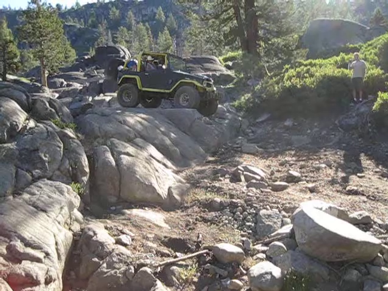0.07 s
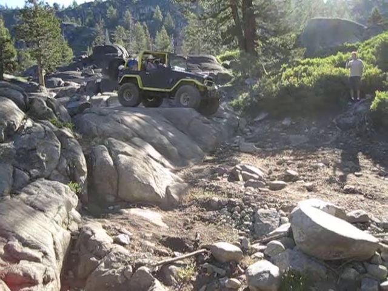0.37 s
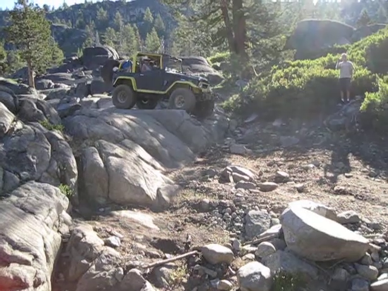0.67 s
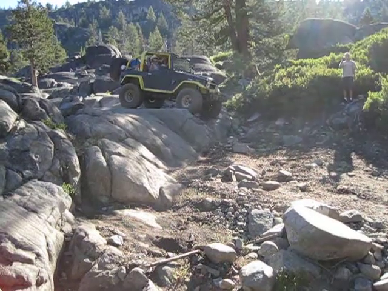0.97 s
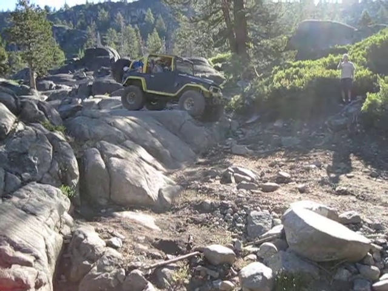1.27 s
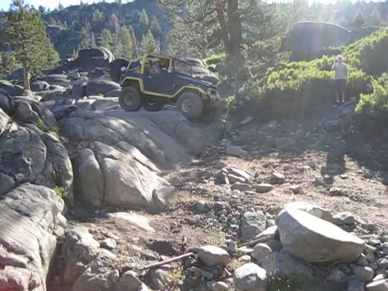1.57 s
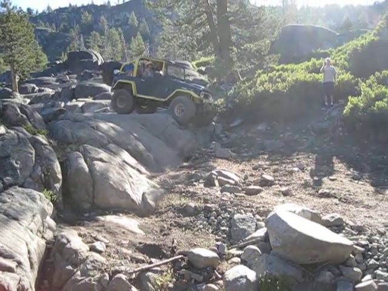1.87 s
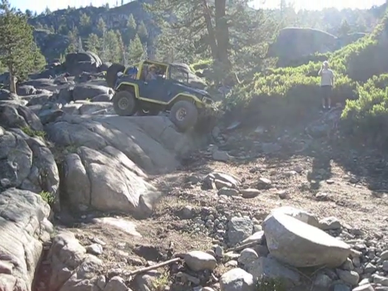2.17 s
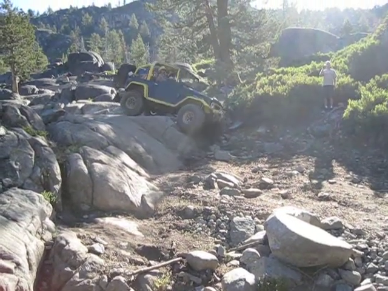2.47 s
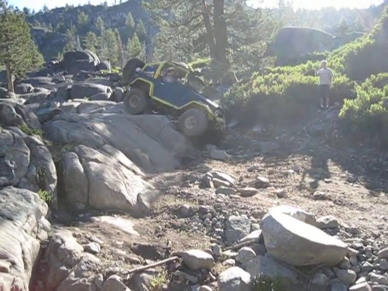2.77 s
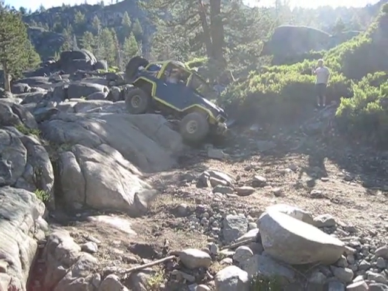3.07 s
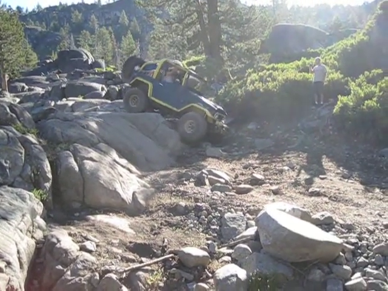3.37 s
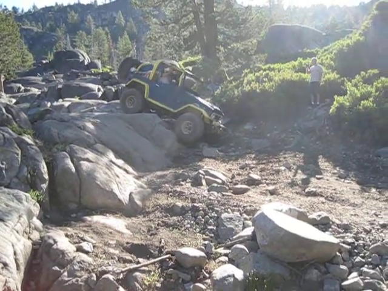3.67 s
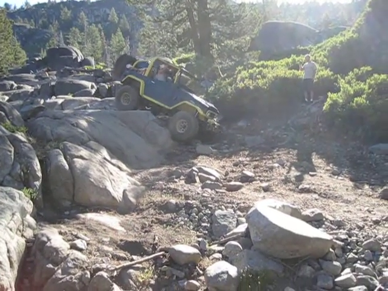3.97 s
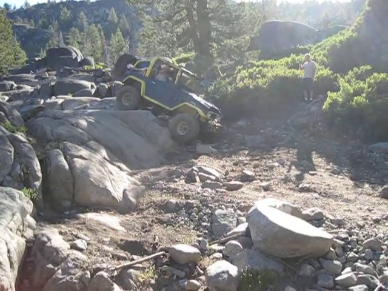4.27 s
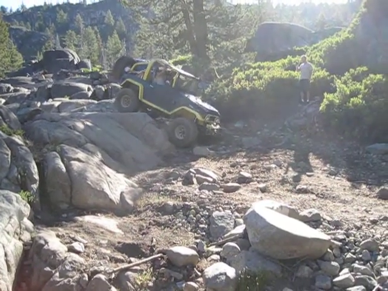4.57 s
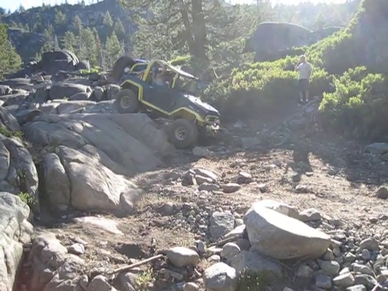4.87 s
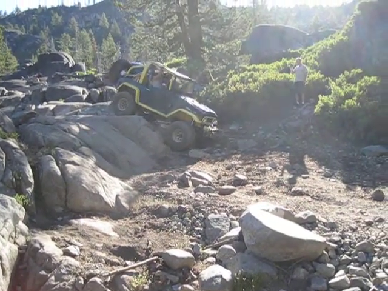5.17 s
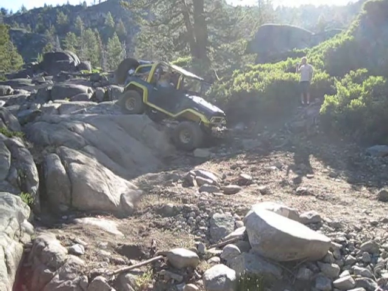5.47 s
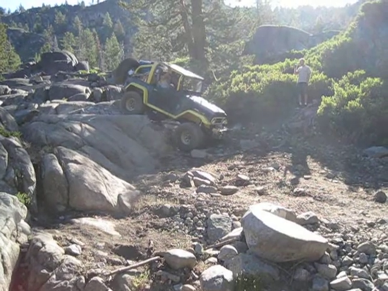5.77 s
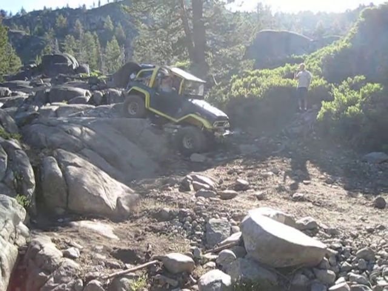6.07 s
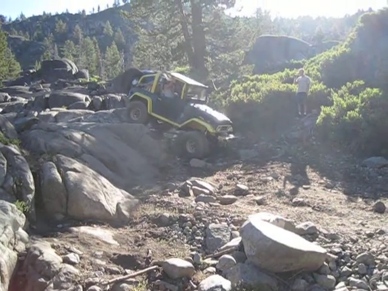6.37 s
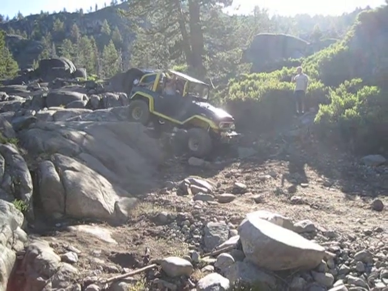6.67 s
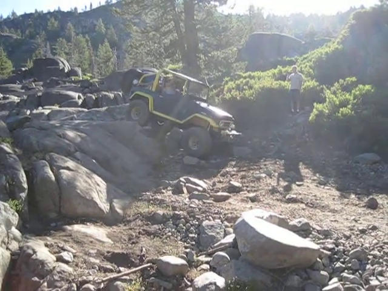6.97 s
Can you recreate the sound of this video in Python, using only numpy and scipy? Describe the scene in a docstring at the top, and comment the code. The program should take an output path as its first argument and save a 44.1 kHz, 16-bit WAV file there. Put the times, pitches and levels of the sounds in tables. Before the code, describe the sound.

An off-road vehicle's engine idles with a deep, slightly wavering boom throughout, the loudest sound, heard from about twenty metres in a forest clearing. Beneath it runs a soft rush of tyres and crunching grit. A sharp stone crack comes at about 1 second, followed by smaller scattered cracks that bunch together from 2.7 seconds and end in a little gravel crunch near 3.7. The brakes add a faint high whine and low groan, mostly from 0.6 to 1.7 seconds, with a weaker whine after 5. From 3.5 to 6.2 seconds a rubbing part gives short, high, raspy squeaks, about five a second, weakening toward the end. A small stone knock falls at 5.3. Tyre rubber moans faintly on rock near the start and after 6.4. Very faint thin peeps, perhaps a bird, appear occasionally. Rocks and trees lightly reflect the high sounds.

```python
"""The idling engine of an open off-road vehicle booms at its firing rate and rings the exhaust pipe.
The vehicle creeps down a granite ledge, some twenty metres away in a forest clearing. By stick-slip
friction a rubbing part, likely a belt, chirps about five times a second, and the brakes sing faintly.
Stones crack and grit crunches under the tyres; thin, high peeps come perhaps from a bird or chipmunk.
Rocks and trees reflect the squeaks, peeps and cracks."""
import sys
import numpy as np
from scipy import signal
from scipy.fft import rfft, irfft
from scipy.io import wavfile
from scipy.ndimage import map_coordinates

SR = 44100
rng = np.random.default_rng(int(sys.argv[2]) if len(sys.argv) > 2 else 0)


def inscribe(sig):
    """Save sig as 16-bit PCM at rate SR to the path in sys.argv[1].

    A 1-D sig is mono; a 2-D sig holds one channel per row.
    Samples are clipped to [-1, 1] before scaling.
    """
    pcm = np.round(np.clip(np.atleast_2d(sig).T, -1, 1) * 32767)
    wavfile.write(sys.argv[1], SR, pcm.astype(np.int16))


N = 314433
TIME = np.arange(N) / SR

# a tyre slips on the granite: middle t/s, length/s, rise of the rush/dB, rubber moan level/dB
TYRE_SLIPS = [(.18, 0.32, 5.5, -45), (1.03, 0.19, 4, -56), (1.693, 0.14, 2.5, -45), (2.85, 1, 3, -70),
              (3.17, .2, 0.5, -68), (6.468, 0.31, 1.5, -45), (6.88, 0.37, 0, -45)]


def undb(db):
    """Amplitude ratio of a level in decibels."""
    return 10 ** (np.asarray(db) / 20)


def unit(x):
    """Normalisation to rms 1."""
    return x / np.sqrt(np.mean(x ** 2) + 1e-20)


def curves(table):
    """Linear interpolation of each column over the times in the first."""
    s, *columns = np.transpose(table)
    return [np.interp(TIME, s, c) for c in columns]


def add(out, s, x):
    """Superposition of x on out from time s."""
    i = max(int(s * SR), 0)
    out[i:i + len(x)] += x[:max(N - i, 0)]


def walk(rate, size=N):
    """Random modulation: rate values a second, linearly joined, spread near 1."""
    at = np.arange(size) * rate / SR
    return map_coordinates(rng.standard_normal(size // 8 + 4), [at], order=1, mode="wrap") * 1.194


def phase_of(hz):
    """Phase in radians, the time integral of frequency."""
    return 2 * np.pi * np.cumsum(hz) / SR


def colour(x, points):
    """Spectral shaping by (f/Hz, level/dB) points, to rms 1."""
    hz, db = np.transpose(points)
    f = np.maximum(np.arange(N // 2 + 1) * SR / N, 1)
    gain = undb(np.interp(np.log(f), np.log(hz), db, left=-120, right=-120))
    return unit(irfft(rfft(x) * gain, N))


def ring(x, hz, *qs):
    """Resonance at hz: one stage in series for each quality factor, gain 1 at the centre."""
    for q in qs:
        x = signal.lfilter(*signal.iirpeak(hz, max(q, 3 * hz / SR), fs=SR), x)
    return x


def swell(size, length, rise, fall):
    """Envelope that grows in rise s, holds until length s and decays with time constant fall s."""
    t = np.arange(size) / SR
    return np.sin(np.pi / 2 * np.minimum(t / rise, 1)) ** 2 * np.exp(-np.maximum(t - length, 0) / fall)


def hump(s, length):
    """Gaussian envelope of height 1 about time s."""
    return np.exp(-(2 * (TIME - s) / length) ** 2)


def clearing(x, near_db, far_db, near_s=0.019, far_s=0.053, absorb_hz=7500, size=20000):
    """Reverberation: boulders scatter early, trees return a fainter tail; both absorb the treble."""
    t = np.arange(size) / SR
    near, far = rng.standard_normal((2, size)) * (t > .002) * np.exp(-t / np.array([[near_s], [far_s]]))
    echoes = (undb(near_db) * unit(near) + undb(far_db) * unit(far)) / np.sqrt(size)
    echoes = signal.lfilter(*signal.butter(2, absorb_hz, fs=SR), echoes)
    return x + signal.fftconvolve(x, echoes)[:N]


def peeps(jitter=0.016, octave_db=-15, size=4000):
    """Short, nearly pure tones with a weak octave: faint, high peeps, perhaps a bird or chipmunk."""
    # thin peeps: t/s, f/Hz, length/s, level/dB
    thin_peeps = [(.154, 6420, .028, -54), (.297, 6320, .018, -54), (.748, 6300, 0.017, -57.5),
                  (.955, 6270, .016, -53), (1.004, 6320, .018, -58), (1.266, 6330, .016, -56),
                  (1.534, 6290, 0.016, -59), (1.601, 6310, .022, -59), (2.558, 2462, 0.038, -44),
                  (3.93, 4140, .013, -54), (4.136, 3980, .018, -50), (5.018, 6310, .016, -59),
                  (5.07, 6360, .018, -55), (5.336, 6260, .016, -56), (6.6, 6370, .025, -58)]
    out = np.zeros(N)
    for s, hz, length, db in thin_peeps:
        phase = phase_of(hz * (1 + jitter * walk(970, size)))
        tone = np.sin(phase) + undb(octave_db) * np.sin(2 * phase)
        add(out, s - .002, undb(db) * tone * swell(size, length, 0.0026, 0.0029))
    return out


def rolling(rush_db=-45.5, grit_db=-51.5, grains_per_s=1500):
    """Broadband noise: fan and tyres rush, crushed sand adds impulses; both rise as a tyre slips."""
    # spectra of the rush and of the grit: f/Hz, relative level/dB
    rush_spectrum = [(150, -23), (260, -6.5), (319, -2.5), (416, -11), (465, -5), (524, -6.5), (643, -6),
                     (682, -11), (762, -6), (859, -8.5), (976, -5.5), (1370, -16), (1740, -22),
                     (1820, -21.5), (2000, -24), (2600, -50), (4400, -120)]
    grit_spectrum = [(820, -27.5), (1400, -4.5), (1750, -5.5), (1890, -1), (2430, -0.5), (3710, -9.5),
                     (4070, -7.5), (4190, -8.5), (5130, -11.5), (6400, -14), (6930, -15.5), (12200, -23.5),
                     (15500, -35)]
    slip_db = sum(rise * hump(s, length) for s, length, rise, _ in TYRE_SLIPS)
    rush = colour(rng.standard_normal(N), rush_spectrum) * undb(rush_db + slip_db + 0.67 * walk(15))
    grains = rng.standard_normal(N) * (rng.random(N) < grains_per_s / SR)
    grains *= undb(3 * np.minimum(rng.exponential(size=N), 4))
    grit = colour(rng.standard_normal(N) + .35 * unit(grains), grit_spectrum)
    return rush + grit * undb(grit_db + 0.56 * slip_db + 0.99 * walk(25))


def tyre_moan(hz=525, q=3.5):
    """Friction of rubber creeping over rock excites one broad resonance."""
    envelope = sum(undb(db) * hump(s, length) for s, length, _, db in TYRE_SLIPS)
    return unit(ring(rng.standard_normal(N), hz, q, q)) * envelope


def brake_mode(hz, presses, drag_db, waver_hz, flutter_db):
    """Self-excited vibration: dragging pads sustain one mode, louder each time they grip."""
    grip = undb(drag_db) * np.ones(N)
    for start, end, db in presses:
        add(grip, start, undb(db) * swell(N, end - start, rise=0.48, fall=.06))
    return np.sin(phase_of(hz + waver_hz * walk(40))) * grip * undb(flutter_db * walk(30))


def brakes(squeal_hz=3950, groan_hz=651, sag_hz_per_s=2.9):
    """Pad friction drives two modes: a high squeal and a low, slowly sinking groan."""
    # brake presses: start t/s, end t/s, added squeal level/dB, added groan level/dB
    presses = [(.62, 1.66, -56, -49), (2.1, 3.0, -73, -57), (4.8, 5.2, -70, -58), (5.197, 6.95, -64, -66)]
    start, end, squeal_db, groan_db = np.transpose(presses)
    squeal = brake_mode(squeal_hz, zip(start, end, squeal_db), drag_db=-67.5, waver_hz=5, flutter_db=.5)
    sinking_hz = groan_hz - sag_hz_per_s * TIME
    groan = brake_mode(sinking_hz, zip(start, end, groan_db), drag_db=-56.5, waver_hz=4.5, flutter_db=-1.4)
    return squeal + groan


def gravel(start_s=3.6, end_s=3.8, count=7, db=-46, hz=3800, decay_s=0.0053):
    """Random small fractures as the front wheel drops off the ledge, as rows for stones()."""
    times = start_s + (end_s - start_s) * (np.arange(count) + rng.random(count)) / count
    return [(s, db + 4 * louder, hz * 2 ** (0.64 * higher), decay_s)
            for s, (louder, higher) in zip(times, rng.standard_normal((count, 2)))]


def stones(size=4000):
    """Brittle fracture: each stone gives way with an impulse and a decaying burst of noise."""
    # stones under the tyres: t/s, peak level/dB, centre f/Hz, decay time/s
    fractures = [(.967, -18, 1380, 0.0016), (1.043, -32, 2380, 0.0095), (1.415, -33.5, 2593, .011),
                 (1.670, -31.5, 3020, 0.0072), (1.938, -38, 4800, 0.0066), (2.107, -32, 440, 0.0059),
                 (2.732, -33.5, 2380, 0.027), (2.814, -40, 5550, .0086), (2.896, -39.5, 4190, 0.0095),
                 (2.966, -39, 5200, .006), (3.083, -37, 3520, 0.0054), (3.169, -34, 2180, 0.02),
                 (3.295, -36, 3000, .0063), (3.398, -38, 4800, 0.014), (3.541, -42, 3000, .006),
                 (5.261, -28, 740, 0.0022)]
    out, t = np.zeros(N), np.arange(size) / SR
    for s, db, hz, decay_s in fractures + gravel():
        burst = rng.standard_normal(size) * undb(2 * walk(700, size)) * np.exp(-t / decay_s)
        burst[0] += 5  # the first snap
        crack = ring(burst, hz, 0.75, 0.94, 0.5)
        add(out, s, undb(db) * crack / np.abs(crack).max())
    return out


def stick_slip(hz, length, rasp, size, steady_hz=3510, jitter=0.0288):
    """Stick-slip oscillation, rms 1: a rough tone that sinks if below steady_hz and rises if above."""
    progress = np.arange(size) / SR / length
    glide = 1 + .00023 * (steady_hz - hz) * (.5 - np.minimum(progress, 1.5))
    phase = phase_of(hz * (glide + jitter * (0.49 + 0.8 * rasp) * walk(750, size)))
    # each slip lets go a little early or late, which blurs the overtones
    blurred = phase + 0.19 * rasp * walk(2200, size)
    overtones = np.sin(2 * blurred) + undb(-5) * np.sin(3 * blurred) + undb(-18) * np.sin(4 * blurred)
    tone = np.sin(phase) + undb(-12.5 - 0.5 * np.minimum(progress, 1)) * overtones
    # contact chatter gives every partial sidebands a few hundred hertz away
    chatter = np.sqrt(2) * np.sin(phase_of(270 + 130 * walk(1000 / 3, size)))
    return unit(tone * (1 + rasp * (.5 * chatter + 0.51 * walk(1000, size))))


def squeaks(scrape_hz=4400, chirp_hz=1020, chirp_db=-39.5, size=6000):
    """Each rub is a low falling chirp, a scrape and a squeal; resonance lifts partials near metal modes."""
    # squeals of the rubbing part: t/s, f/Hz, length/s, level before resonance/dB, rasp depth
    rubs = [(3.464, 3490, 0.015, -35.5, 0.19), (3.645, 3560, 0.02, -37.5, 0.76),
            (3.833, 3570, 0.032, -36, 0.92), (4.033, 3523, 0.034, -35, 1.14),
            (4.234, 3416, 0.031, -34, 0.97), (4.417, 3330, 0.03, -36, 1.2),
            (4.590, 3326, 0.034, -36.5, 1.24), (4.767, 3225, 0.0312, -32.5, 0.76),
            (4.948, 3400, .026, -38, 0.65), (5.143, 3474, 0.04, -42, 0.99),
            (5.373, 3670, 0.037, -42.5, 0.4), (5.609, 3435, .041, -38.5, 0.99),
            (5.822, 3440, 0.038, -37.5, 1.37), (6.011, 3375, 0.038, -39.5, 0.92),
            (6.197, 3600, 0.024, -48.7, 1.2)]
    # modes of the rubbed metal: f/Hz, Q, gain/dB
    metal_modes = [(3260, 130, -10), (3478, 100, -3.5), (6260, 33, 1.5)]
    out, t = np.zeros(N), np.arange(size) / SR
    for s, hz, length, db, rasp in rubs:
        squeal = stick_slip(hz, length, rasp, size)
        add(out, s - .001, undb(db) * squeal * swell(size, length * 0.82, 0.013, 0.0077))
        scrape = unit(ring(rng.standard_normal(size), scrape_hz, 0.76, 0.54))
        add(out, s - .004, undb(db - 16) * scrape * swell(size, 0.014, .004, 0.01))
        glide = 1.06 - 0.171 * np.minimum(t / 0.0183, 1)
        phase = phase_of(chirp_hz * (glide + 0.118 * walk(890, size)))
        chirp = sum(gain * np.sin(k * phase) for k, gain in enumerate((1, 0.37, 0.2, 0.47), 1))
        add(out, s - .007, undb(chirp_db) * chirp * swell(size, 0.013, 0.0053, 0.0047))
    return out + sum(undb(db) * ring(out, hz, q) for hz, q, db in metal_modes)


def exhaust_rumble(firing_phase, puff_depth=0.49):
    """Forced resonance: gas puffs out with each firing and rings the pipe, over a steady low noise."""
    # modes of the exhaust and body panels: f/Hz, bandwidth per stage/Hz, relative level/dB
    pipe_modes = [(83.4, 9.5, 4), (98.1, 9.6, -1), (150.7, 21, -1.5), (166.8, 11.2, -1.5), (219.1, 5.7, -9),
                  (327, 20, -15), (536, 22, -17.5)]
    # spectrum of the gas noise: f/Hz, relative level/dB
    gas_spectrum = [(56, -35), (95, -5), (123, -10), (166, 2), (248, -9.5), (323, -20.5), (420, -17.5),
                    (550, -56), (920, -120)]
    flow = rng.standard_normal(N) * (1 + puff_depth * np.sin(firing_phase))
    pipe = sum(undb(db) * unit(ring(flow, hz, hz / width, hz / width)) for hz, width, db in pipe_modes)
    return pipe + undb(-1) * colour(rng.standard_normal(N), gas_spectrum)


def engine(octave_db=-37, shake_hz=52, shake_db=-41, dip_s=.05):
    """Periodic firing makes the exhaust boom at the firing rate, over gas rumble and a low shake."""
    # exhaust under changing load: t/s, boom level/dB, rumble gain/dB
    load = [(0.3, -13, -43), (1.75, -14, -45.5), (2.1, -16.5, -44.5), (2.9, -13.5, -44.5),
            (3.45, -15, -43.5), (4.2, -14.5, -46.5), (5.5, -15, -45), (6.4, -14.8, -42),
            (6.9, -13.5, -46.5)]
    # engine speed hunting round idle: t/s, firing f/Hz
    firing_rate = [(0.3, 60.3), (1.2, 61.5), (1.7, 59.8), (2.2, 62.9), (3.1, 59.9), (3.4, 62), (4.1, 60),
                   (4.55, 61.4), (5.2, 60.5), (5.8, 62.2), (6.15, 61.2), (6.32, 58.4), (7.13, 59.3)]
    # brief dips of the boom: t/s, depth/dB
    dips = [(.152, 14), (2.34, 3), (2.73, 7.5), (4.44, 6), (4.63, 8.5)]
    boom_db, rumble_db = curves(load)
    (firing_hz,) = curves(firing_rate)
    boom_db = boom_db + walk(13) - sum(depth * hump(s, dip_s) for s, depth in dips)
    phase = phase_of(firing_hz + 0.56 * walk(13))
    boom = np.sqrt(2) * (np.sin(phase) + undb(octave_db) * np.sin(2 * phase))
    # the cylinders differ, which modulates the amplitude over a cycle of eight firings
    cycle = phase / 8
    throb = 1 + 0.064 * np.sin(cycle) + 0.075 * np.sin(3 * cycle) + .025 * np.sin(5 * cycle)
    throb += 0.036 * walk(22)
    rumble = exhaust_rumble(phase)
    shake = unit(ring(rng.standard_normal(N), shake_hz, 1.3, 1.3))
    return undb(boom_db) * boom * throb + undb(rumble_db) * rumble + undb(shake_db) * shake


def scene():
    """Superposition of tyres, squeaks, peeps, stones, engine and brakes at one listening point."""
    tyres = rolling() + tyre_moan()
    high_tones = clearing(squeaks() + peeps(), near_db=-2.5, far_db=-12)
    cracks = clearing(stones(), near_db=-15, far_db=-25.5)
    return (tyres + high_tones + cracks + engine() + brakes())[None]


def record(dry, start_s=.072, opening_db=8, settle_s=0.024, top_hz=15700):
    """Gating and low-pass filtering: the sound enters after a moment, briefly loud, without top treble."""
    gate = np.clip((TIME - start_s) / .003, 0, 1)
    settling = undb(opening_db * np.exp(-np.maximum(TIME - start_s, 0) / settle_s))
    low_pass = signal.ellip(8, .2, 80, top_hz, fs=SR, output="sos")
    return signal.sosfilt(low_pass, dry * gate * settling)


dry = scene()
out = record(dry)
inscribe(out)
```